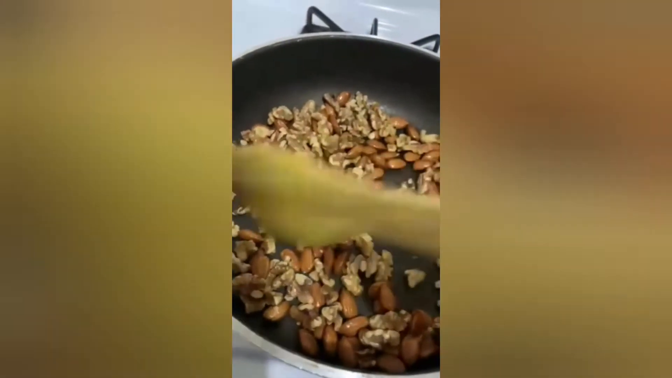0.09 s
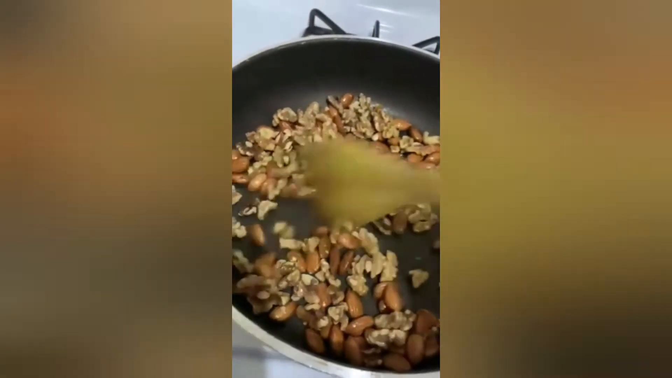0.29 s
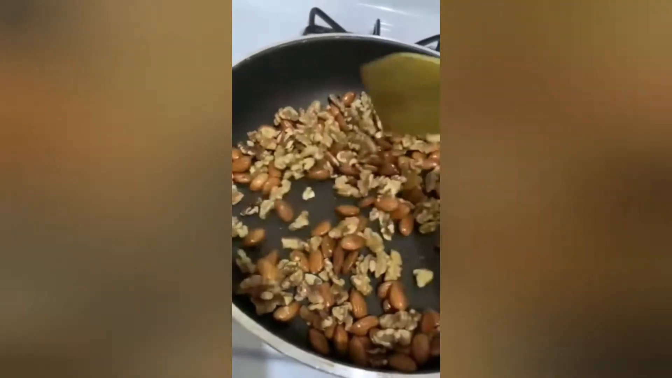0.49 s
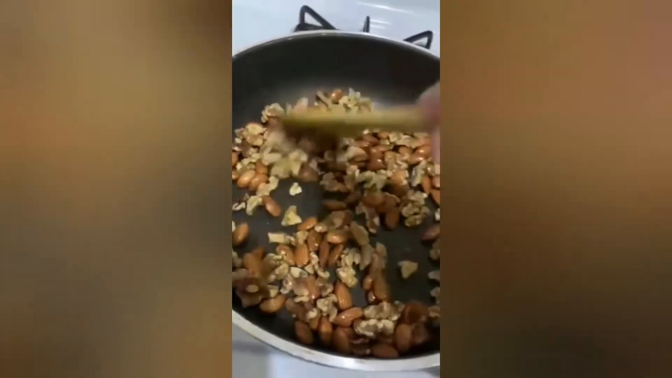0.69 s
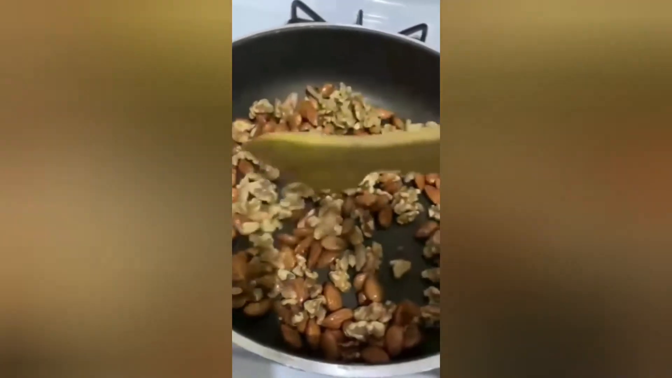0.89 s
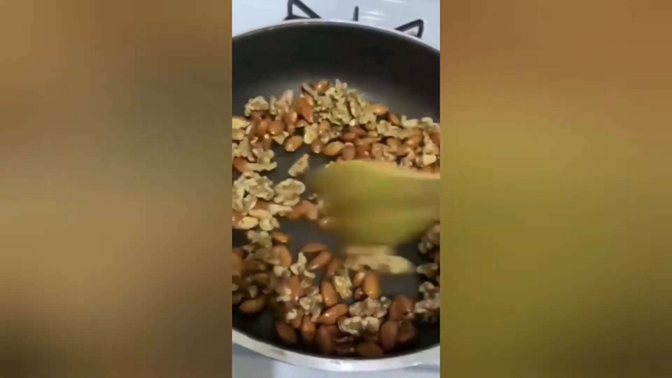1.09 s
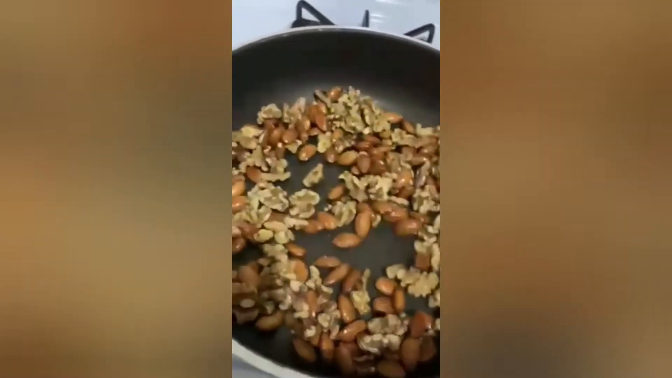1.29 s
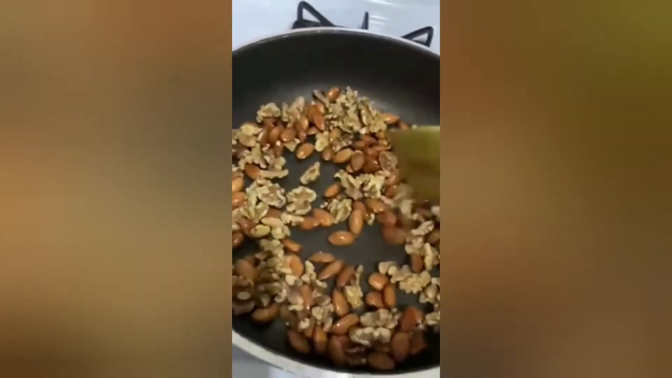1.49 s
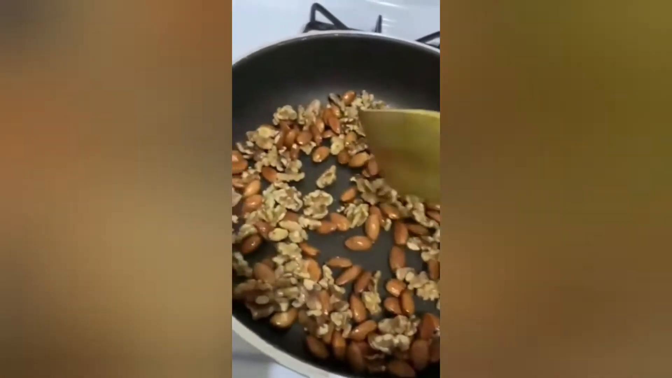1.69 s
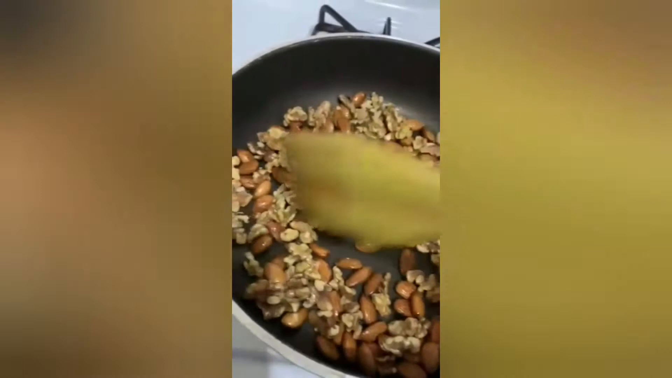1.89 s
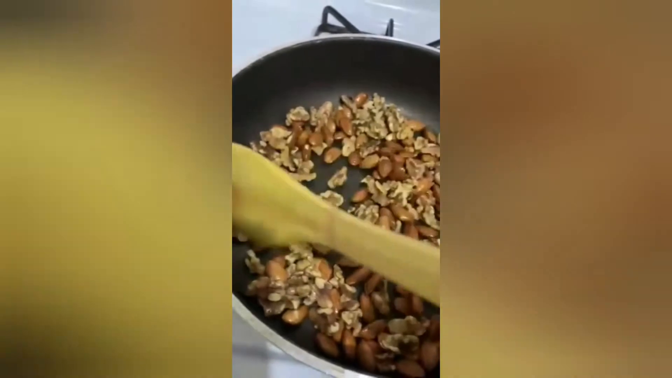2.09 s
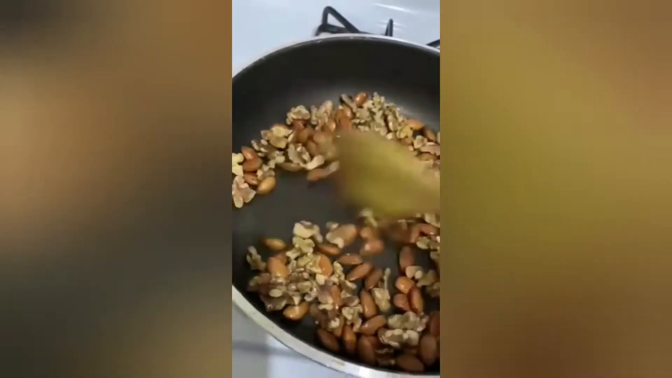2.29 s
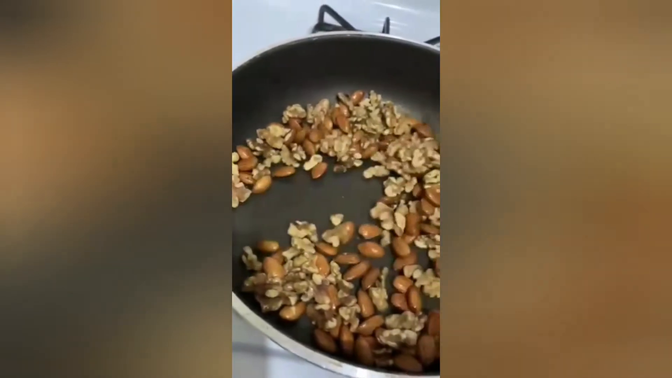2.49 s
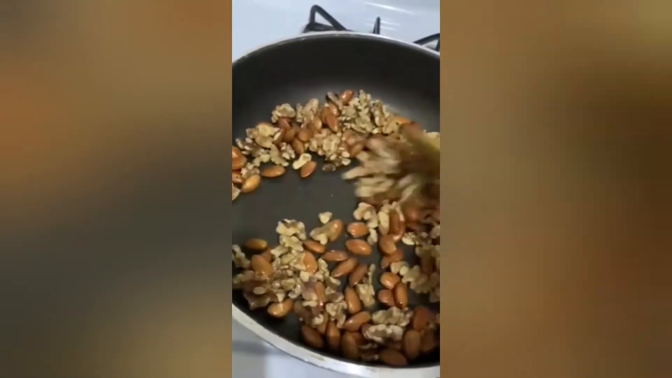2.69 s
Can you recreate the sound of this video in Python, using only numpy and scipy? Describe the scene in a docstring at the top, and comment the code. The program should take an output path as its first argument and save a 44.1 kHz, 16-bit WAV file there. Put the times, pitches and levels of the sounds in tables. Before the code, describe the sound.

Nuts rattle and knock in a frying pan as a wooden spatula stirs them in bursts

```python
"""Knocks, scrapes and dry ticks: nuts are stirred in a frying pan with a wooden spatula, over a gas flame.
Each knock rings a bank of damped pan modes; tumbling nuts ring them with streams of small clicks.
Ticks are very short noise cracks, and one gritty treble hiss stands for the flame and the scraping.
Under them lie a kitchen rumble, a low drone and the rumble of the pan on its stand.
A short dull room is added, and a close pair of microphone ports listens."""
import sys
import numpy as np
from scipy import signal
from scipy.fft import rfft, irfft
from scipy.io import wavfile
from scipy.ndimage import uniform_filter1d

SR = 44100
rng = np.random.default_rng(int(sys.argv[2]) if len(sys.argv) > 2 else 0)


def decibels_to_gain(level_db):
    """Convert a level in decibels to a linear amplitude gain (20 dB per decade)."""
    exponent = np.asarray(level_db, float) / 20
    return 10 ** exponent


def persist_wave(psi):
    """Save psi, clipped to +-1, as 16-bit WAV."""
    counts = np.round(np.clip(psi, -1, 1) * 32767).astype(np.int16)
    wavfile.write(sys.argv[1], SR, np.atleast_2d(counts).T)


N = 119070

# Modes of the damped pan. Each row: strength in dB, freely ringing time to -60 dB in seconds.
PAN_MODES = [(-10, 0.072), (-4.5, 0.059), (1, 0.051), (-4.5, 0.09), (-3, 0.054), (-1.5, 0.069), (-1, 0.041),
             (-5.5, 0.064), (-2, 0.051), (-1.5, 0.031), (-2.5, 0.044), (-6, 0.034), (-6, 0.082),
             (-8.5, 0.031), (-12, 0.036), (-16, 0.12), (-13.5, 0.074)]


def evened(x):
    """Scales a sound to an rms of one."""
    return x / np.sqrt(np.mean(x ** 2) + 1e-20)


def read(points, hz):
    """Reads a table of (Hz, value) at any pitch, in straight lines over log frequency."""
    f, value = np.transpose(points)
    return np.interp(np.log(hz + 1), np.log(f + 1), value)


def add(mix, s, sound):
    """Lays a sound into the mix from a given second on."""
    part = mix[round(s * SR):][:len(sound)]
    part += sound[:len(part)]


def coloured(x, points):
    """Filters a sound by a table of (Hz, dB)."""
    size = x.shape[-1]
    gain = decibels_to_gain(read(points, np.fft.rfftfreq(size, 1 / SR)))
    return irfft(rfft(x) * gain, size)


def stirring(axis):
    """The stirring movement as a gain per sample: axis 1 drives the tumbling, axis 2 the scrape hiss."""
    # Each row: time in seconds, tumbling in dB, scrape hiss in dB, both before the trim of their layer.
    stir = [(0, -44, -61.5), (.06, -66, -62), (0.183, -59, -61), (0.207, -43.5, -37.5), (0.249, -25.5, -34),
            (.3, -28.5, -49.5), (.4, -36.5, -61), (.47, -40.5, -60.5), (.52, -48.5, -62), (0.608, -59, -62),
            (.635, -37, -48.5), (.68, -39, -54), (0.738, -41.5, -54), (0.763, -24.5, -45), (.83, -41, -61),
            (.9, -44, -58.5), (.96, -50, -60.5), (0.982, -23.5, -46), (1.04, -31.5, -48), (1.1, -34, -48.5),
            (1.179, -40, -56.5), (1.25, -54.5, -63), (1.33, -53, -59), (1.42, -42, -50), (1.56, -44, -71),
            (1.62, -58.5, -59.5), (1.75, -68, -61.5), (2.05, -68, -62.5), (2.074, -60, -48.5),
            (2.13, -43.5, -52), (2.2, -37.5, -46.5), (2.248, -28.5, -44), (2.31, -31.5, -50.5),
            (2.38, -39, -58), (2.5, -45, -60), (2.62, -47, -56), (2.7, -31.5, -50)]
    return decibels_to_gain(np.interp(np.arange(N) / SR, [row[0] for row in stir], [row[axis] for row in stir]))


def clicks(per_s, spread_db):
    """A sparse train of clicks of either sign, a few of them large."""
    size = decibels_to_gain(spread_db * np.minimum(rng.exponential(1, N), 4))
    return size * (rng.random(N) < per_s / SR) * rng.choice([-1., 1.], N)


def pan_ring(spot_hz, force, ringing, scatter_db):
    """One blow sounds all pan modes, the low ones swelling later, with the short dry clack of the contact."""
    # Pitches of the pan modes in Hz, one for each row of PAN_MODES.
    pan_hz = [322, 398, 467, 598, 705, 740, 856, 1030, 1122, 1260, 1580, 1810, 1870, 2240, 2630, 3040, 3500]
    hz = np.array(pan_hz)[:, None]
    db, t60 = np.transpose(PAN_MODES)[:, :, None]
    level_chance, pitch_chance, phase_chance = rng.standard_normal((3, len(PAN_MODES), 1))
    noise = rng.standard_normal(6000)
    t = np.arange(len(noise)) / SR

    # the spot favours modes near its pitch; a harder blow reaches more of them
    reach_octaves = .7 + 1.2 * force
    floor_db = -13
    near = decibels_to_gain(floor_db) + np.exp(-(np.log2(hz / spot_hz) / reach_octaves) ** 2)
    heights = near * decibels_to_gain(db + scatter_db * level_chance)
    rise_cycles, detune = 1.17, .007
    swell = 1 - np.exp(-(t * hz / rise_cycles) ** 2)
    decay = decibels_to_gain(-60 * t / (t60 * ringing))
    turns = hz * (1 + detune * pitch_chance) * t + phase_chance
    modes = heights * decay * swell * np.sin(2 * np.pi * turns)

    # contact clack: two octaves of noise around the spot's pitch
    clack_db, clack_t60, contact_s = -8, 0.02, 0.00085
    band = signal.butter(3, [spot_hz / 2, spot_hz * 2], "band", fs=SR, output="sos")
    wide = evened(signal.sosfilt(band, noise))
    clack_shape = decibels_to_gain(clack_db - 60 * t / clack_t60) * (1 - np.exp(-(t / contact_s) ** 2))
    clack = clack_shape * wide * np.linalg.norm(heights)
    sound = modes.sum(0) + clack
    return sound / abs(sound).max()


def kitchen():
    """Steady low rumble of shaped noise, with a fuzzy tone of narrow noise."""
    # Spectrum of the rumble. Each row: frequency in Hz, relative density in dB per Hz.
    air = [(15, -27), (25, -15.5), (71, 2.5), (161, -4.5), (229, -5), (280, -6.5), (408, -10), (446, -13.5),
           (2410, -32), (3000, -68), (3750, -32), (5000, -75), (6500, -168), (11000, -120)]
    # Fuzzy low tone. Each row: centre in Hz, level in dB, width in Hz.
    hum = [(79, -62, 4.8)]
    air_db = -49.5
    hz = np.fft.rfftfreq(N, 1 / SR)
    out = decibels_to_gain(air_db) * evened(coloured(rng.standard_normal(N), air))
    for tone_hz, db, width_hz in hum:
        bell = np.exp(-((hz - tone_hz) / width_hz) ** 2)
        out = out + decibels_to_gain(db) * evened(irfft(rfft(rng.standard_normal(N)) * bell, N))
    return out


def drone():
    """A cleaner hum that comes and goes: one low sine of slightly unsteady pitch."""
    # Each row: time in seconds, rms level in dB.
    swells = [(0, -58), (.35, -48), (.5, -62), (.7, -52.5), (1., -49.5), (1.1, -64), (1.2, -50),
              (1.75, -54), (1.82, -75), (1.95, -59), (2.15, -47.5), (2.3, -65), (2.7, -53)]
    drone_hz, waver_hz = 141.3, 2.01
    waver = evened(uniform_filter1d(rng.standard_normal(N), size=4000))
    level = decibels_to_gain(np.interp(np.arange(N) / SR, *np.transpose(swells)))
    turns = np.cumsum(drone_hz + waver_hz * waver) / SR
    return np.sqrt(2) * level * np.sin(2 * np.pi * turns)


def grate():
    """The pan rumbles softly on its stand: low noise that follows the smoothed stirring."""
    # Each row: frequency in Hz, relative density in dB per Hz.
    rumble = [(30, -7), (70, -0.5), (150, 1), (300, -7.5), (420, -31)]
    grate_db = -15.5  # on top of the stirring level
    movement = uniform_filter1d(stirring(axis=1), size=2000)
    return decibels_to_gain(grate_db) * movement * evened(coloured(rng.standard_normal(N), rumble))


def scrape():
    """Gritty treble hiss of the flame and of wood and crumbs on the coating: clicks mixed with noise."""
    # Each row: frequency in Hz, relative density in dB per Hz.
    hiss = [(1470, -28), (2500, -8), (3150, -6.5), (4880, -1), (6150, -3), (10500, -5.5), (11800, 7.5),
            (12800, -85), (16600, -98), (22000, -120)]
    grit_share, hiss_db = 0.59, 4.94  # hiss_db goes on top of the stirring level
    grains = evened(clicks(per_s=2500, spread_db=1))
    grit = grit_share * grains + (1 - grit_share) * rng.standard_normal(N)
    return decibels_to_gain(hiss_db) * stirring(axis=2) * evened(coloured(grit, hiss))


def tumbling():
    """Many small nut blows and steady rubbing ring the pan at two dozen different spots."""
    nuts_per_s, rub_db, tumble_db = 450, -10, -1.25  # rub_db is relative to the nut blows
    spots = np.geomspace(440, 2300, num=24)  # Hz
    drive = []
    for _ in spots:
        blows = evened(clicks(nuts_per_s / len(spots), spread_db=4))
        drive.append(blows + decibels_to_gain(rub_db) * rng.standard_normal(N))
    rings = np.array([pan_ring(hz, force=0, ringing=.8, scatter_db=3.5) for hz in spots])
    sound = signal.fftconvolve(stirring(axis=1) * drive, rings / np.linalg.norm(rings), axes=1)
    return decibels_to_gain(tumble_db) * sound[:, :N].sum(0)


def ticks():
    """Dry ticks of hard nuts: very short bright cracks of noise, each with its own treble tilt."""
    # Each row: start in seconds, peak in dB before the trim, tilt in dB per octave around 7 kHz.
    hard_nuts = [(0.2014, -21, 4), (0.2266, -11.5, -5.5), (0.2349, -9, -6.2), (0.6235, -20.5, -7),
                 (0.7637, -26.5, -9), (1.1124, -24.5, 6.5), (1.3723, -31, -9.5), (1.5889, -32, 0),
                 (2.0627, -25.5, 4), (2.1449, -20, -12), (2.4301, -10.5, 6.6), (2.608, -19, 13.8)]
    # Spectrum of a tick before its tilt. Each row: frequency in Hz, relative density in dB per Hz.
    tick_colour = [(1500, -60), (2500, -4), (3640, 5), (6400, 3), (8800, 2.5), (11300, 2), (14500, 5),
                   (16000, -58)]
    trim_db, t60, rise_s = 3., .011, 0.0012
    out, t = np.zeros(N), np.arange(1024) / SR
    shape = decibels_to_gain(-60 * t / t60) * (1 - np.exp(-(t / rise_s) ** 2))
    for s, db, tilt_db in hard_nuts:
        tilted = [(hz, level + tilt_db * np.log2(hz / 7000)) for hz, level in tick_colour]
        crack = coloured(rng.standard_normal(len(t)), tilted) * shape
        add(out, s, decibels_to_gain(db + trim_db) * crack / abs(crack).max())
    return out


def knocks():
    """The single loud blows of spatula and nuts on the pan; louder ones also reach more modes."""
    # Each row: start in seconds, peak in dB before the trim, pitch in Hz favoured by the spot that is hit,
    # share of the free ringing time.
    blows = [(0.189, -25.5, 2030, 0.48), (0.202, -17.5, 3250, 1), (0.218, -13.5, 2750, 1),
             (0.225, -5.5, 1800, 0.79), (0.235, -4.5, 510, 0.55), (0.292, -14, 734, 0.3),
             (0.324, -20, 1160, 0.61), (0.33, -16.5, 1130, 0.48), (0.349, -18, 1040, 0.62),
             (0.355, -19.5, 863, 1), (0.402, -25, 980, 1), (0.431, -21, 697, 0.68),
             (0.445, -14, 1150, 0.88), (0.623, -10.5, 1920, 0.57), (0.674, -23, 1030, 1),
             (0.754, -14, 1210, 0.9), (0.763, -12, 790, 0.54), (0.795, -10.5, 760, 0.84),
             (0.824, -19.5, 743, 1), (0.87, -20.5, 760, 0.9), (0.918, -22.5, 760, 0.95),
             (0.97, -20, 1090, 0.78), (1.007, -1, 484, 1), (1.044, -17.5, 710, 1), (1.065, -21, 696, 0.9),
             (1.111, -21.5, 596, 0.47), (1.133, -25, 607, 1), (1.188, -30, 750, 0.9),
             (1.373, -26.5, 1940, 0.9), (1.42, -22, 1940, 0.47), (1.456, -28, 754, 0.68),
             (1.484, -24, 1690, 1), (1.527, -30, 715, 0.9), (1.546, -19.5, 1680, 0.64),
             (1.584, -35, 1050, 0.81), (1.657, -37.5, 920, 0.8), (2.074, -25.5, 384, 0.72),
             (2.145, -15.5, 1250, 1), (2.179, -27.5, 328, 0.76), (2.214, -27, 776, 1),
             (2.243, -12.5, 1160, 0.9), (2.27, -22, 1120, 0.7), (2.289, -19, 620, 1),
             (2.309, -15.5, 736, 0.9), (2.35, -23, 681, 0.67), (2.4, -27, 770, 0.9),
             (2.467, -32.5, 861, 0.41), (2.499, -19.5, 1160, 0.42), (2.539, -23, 1770, 0.43),
             (2.577, -30.5, 1890, 0.37), (2.641, -31.5, 888, 0.72), (2.684, -28.5, 600, 1),
             (1.327, -28, 1870, 0.41), (2.061, -21.5, 1740, 0.76), (2.607, -28, 1880, 0.44)]
    trim_db = -2.5
    out = np.zeros(N)
    for s, db, spot_hz, ringing in blows:
        blow = pan_ring(spot_hz, np.sqrt(decibels_to_gain(db)), ringing, scatter_db=3.)
        add(out, s, decibels_to_gain(db + trim_db) * blow)
    return out


def room(x):
    """A short, dull diffuse tail of decaying noise, another one for each path."""
    t60, top_hz = 0.18, 3780
    t = np.arange(SR // 3) / SR
    tail = rng.standard_normal((2, len(t))) * decibels_to_gain(-60 * t / t60) * (t > .003)
    dull = signal.lfilter(*signal.butter(2, top_hz, fs=SR), x)
    return signal.fftconvolve(dull[None], tail / np.linalg.norm(tail[0]), axes=1)[:, :N]


def scattered(x):
    """Three diffuse paths fade in and out in turn at a steady rate, which widens the sound."""
    t60, half_turns_per_s = .012, 7
    t = np.arange(600) / SR
    paths = rng.standard_normal((3, len(t))) * decibels_to_gain(-60 * t / t60)
    paths = paths / np.linalg.norm(paths, axis=1)[:, None]
    # the squared gains of the three paths always add up to one
    turn = np.pi * (half_turns_per_s * np.arange(N) / SR + np.arange(3)[:, None] / 3)
    fed = np.sqrt(2 / 3) * np.cos(turn) * x
    return signal.oaconvolve(fed, paths, axes=1)[:, :N].sum(0)


def scene():
    """The pan, its room and the kitchen; the second row hears the pan by the diffuse paths."""
    low_cut = signal.butter(6, 289, "high", fs=SR, output="sos")  # Hz
    pan = signal.sosfilt(low_cut, knocks() + tumbling()) + ticks() + scrape()
    direct = pan + kitchen() + drone() + grate()
    diffuse = scattered(pan) + kitchen()
    room_db = -8
    return np.array([direct, diffuse]) + decibels_to_gain(room_db) * room(pan)


def top_cut(x):
    """Nothing passes above the cut-off."""
    return signal.sosfilt(signal.butter(12, 12920, fs=SR, output="sos"), x)


def record(dry):
    """Two ports share part of the sound, with a lag and a lean that depend on pitch, and a treble limit."""
    # Each row: frequency in Hz, likeness of the two ports from 0 to 1.
    likeness = [(150, .99), (300, .88), (600, .72), (1500, .72), (3000, .75), (4500, .96), (10000, .97)]
    # Each row: frequency in Hz, phase in radians by which the left port leads.
    lead = [(0, 0), (200, 0), (520, -.8), (2300, .8), (4800, np.pi), (9000, 3 * np.pi), (13300, 5 * np.pi)]
    # Each row: frequency in Hz, left over right in dB.
    lean = [(250, 0), (420, -2), (700, -5.5), (1100, -5), (1800, -2), (2900, -1.5), (4700, 0)]
    edge_hz, above_edge_db = 10900, -20.5
    hz = np.fft.rfftfreq(N, 1 / SR)
    direct, diffuse = rfft(dry)
    same = np.clip(read(likeness, hz), 0, 1)
    common = np.sqrt((1 + same) / 2) * direct
    apart = np.sqrt((1 - same) / 2) * diffuse
    # half of the lean and lead goes to each port
    turn = decibels_to_gain(read(lean, hz) / 2) * np.exp(.5j * np.interp(hz, *np.transpose(lead)))
    edge = (1 / np.sqrt(1 + (hz / edge_hz) ** 60) + decibels_to_gain(above_edge_db)) * (hz < 15000)
    ports = irfft(np.array([(common + apart) * turn, (common - apart) / turn]) * edge, N)
    return top_cut(ports)


dry = scene()
out = record(dry)
persist_wave(out)
```